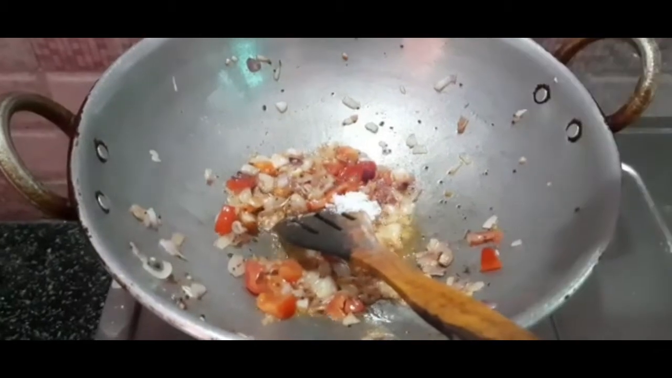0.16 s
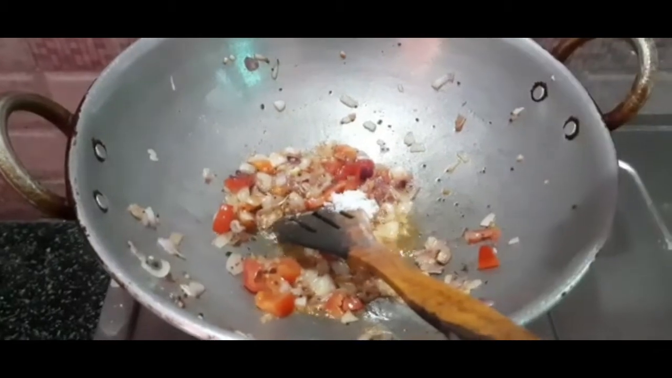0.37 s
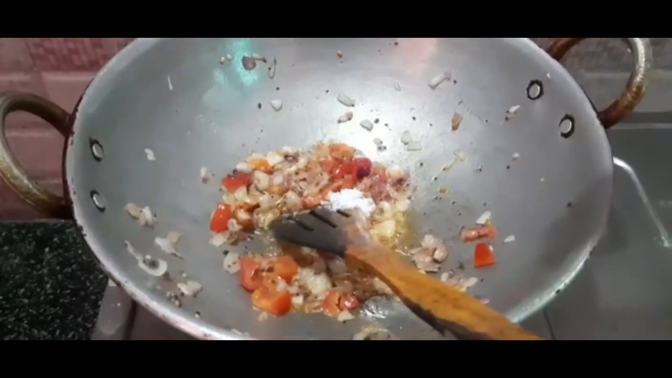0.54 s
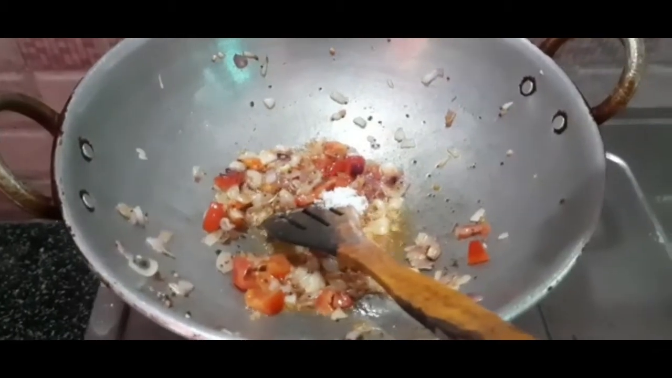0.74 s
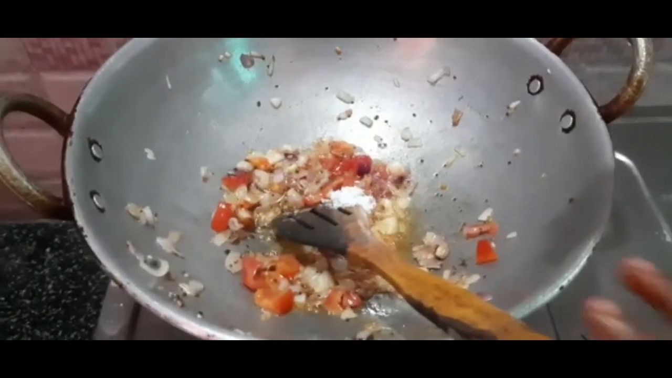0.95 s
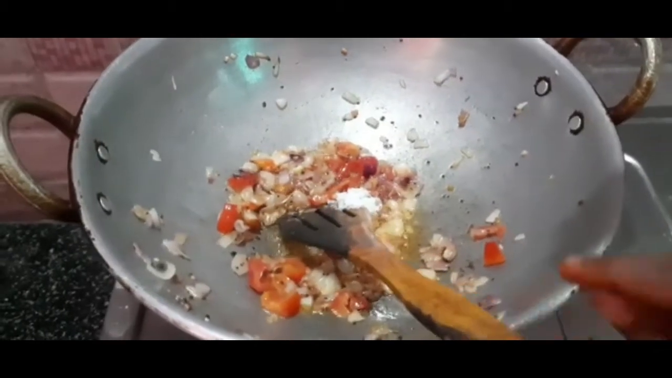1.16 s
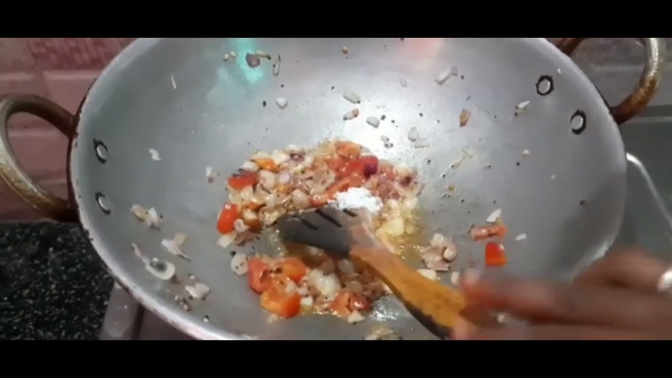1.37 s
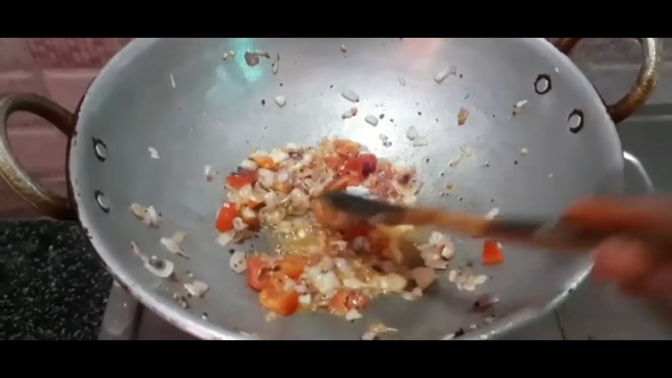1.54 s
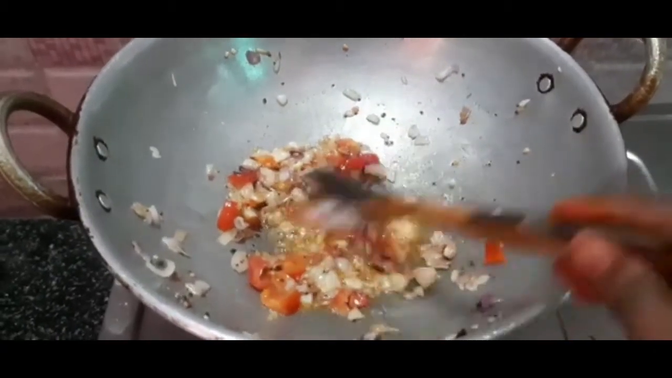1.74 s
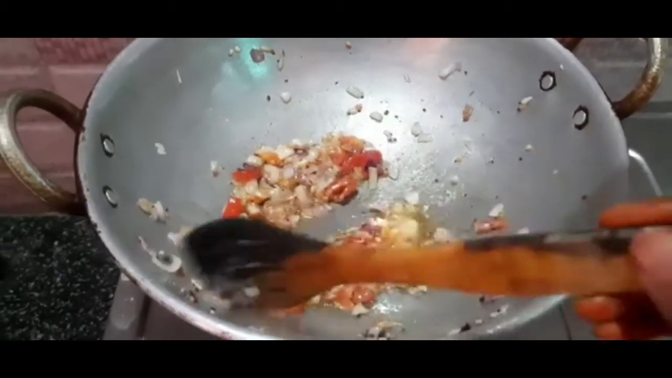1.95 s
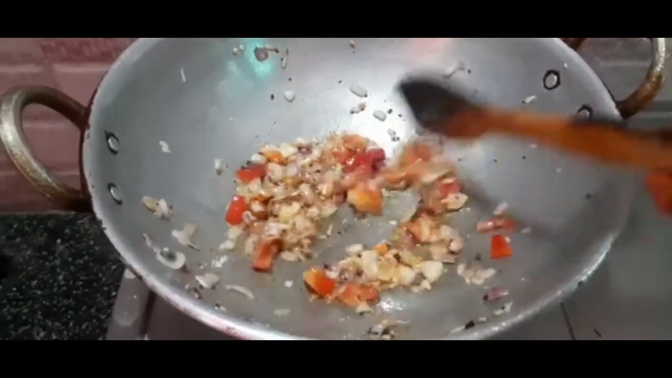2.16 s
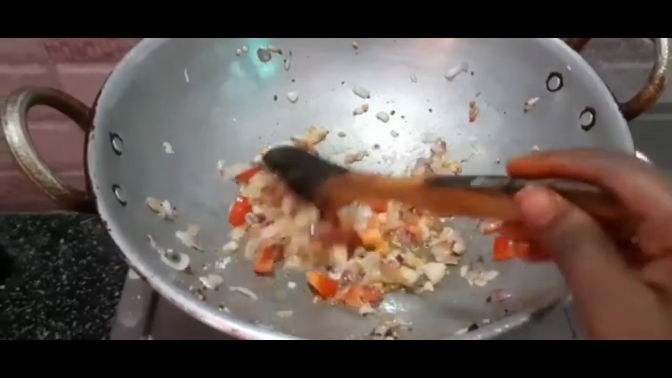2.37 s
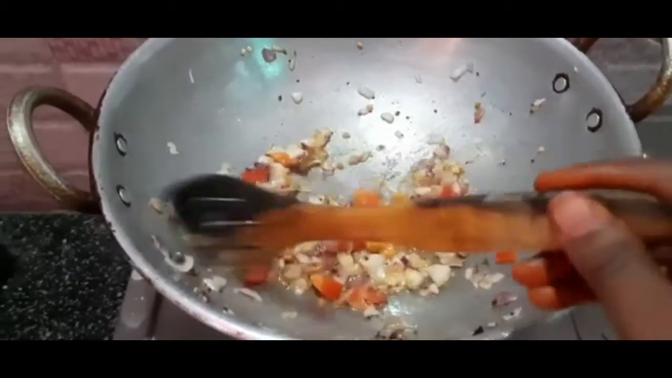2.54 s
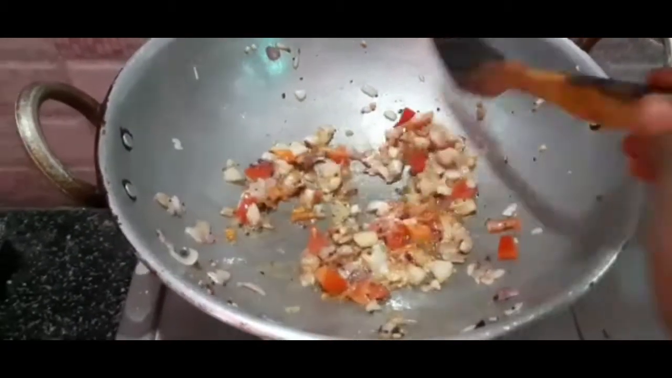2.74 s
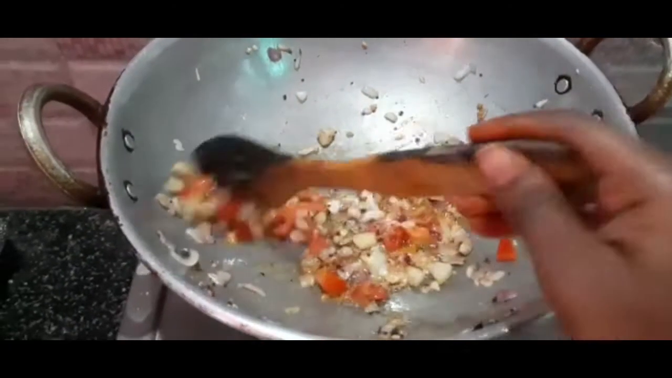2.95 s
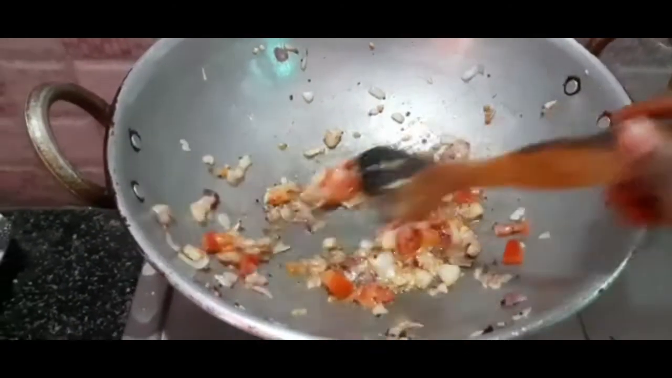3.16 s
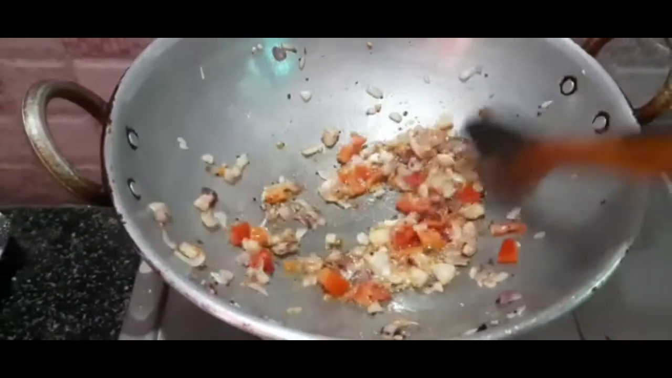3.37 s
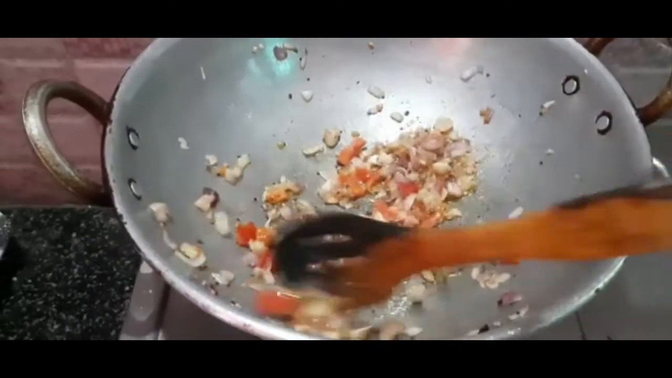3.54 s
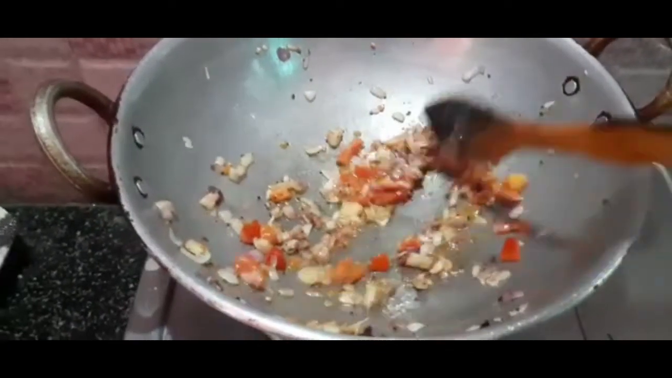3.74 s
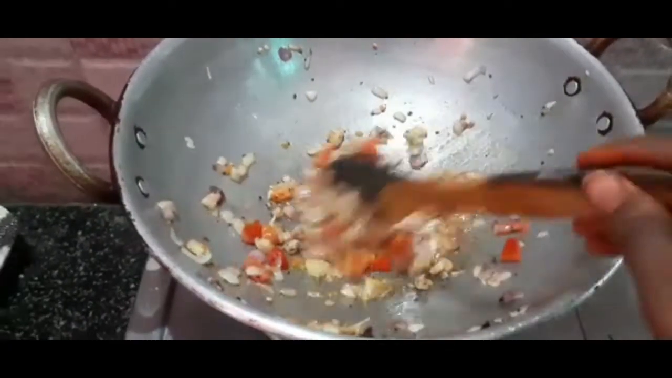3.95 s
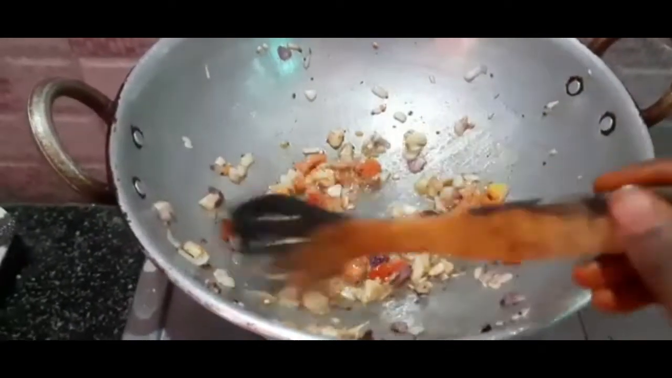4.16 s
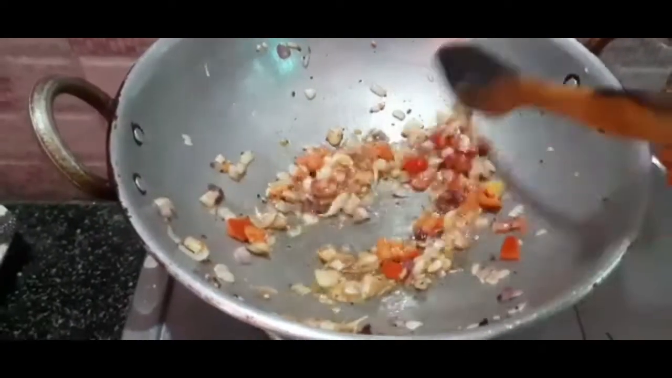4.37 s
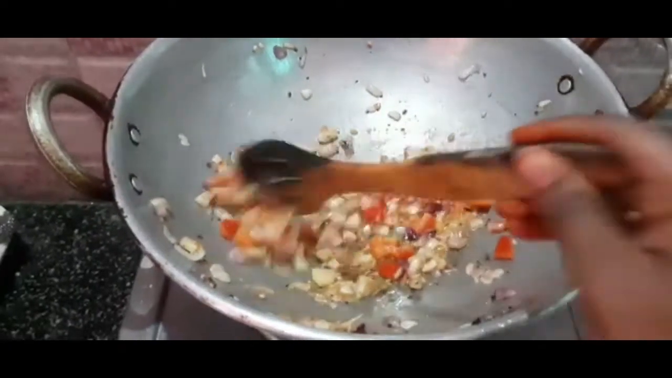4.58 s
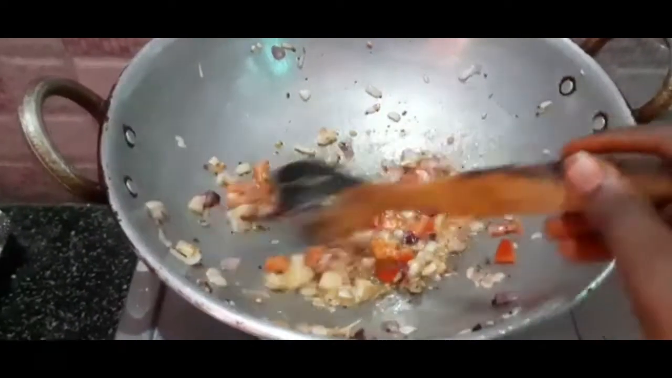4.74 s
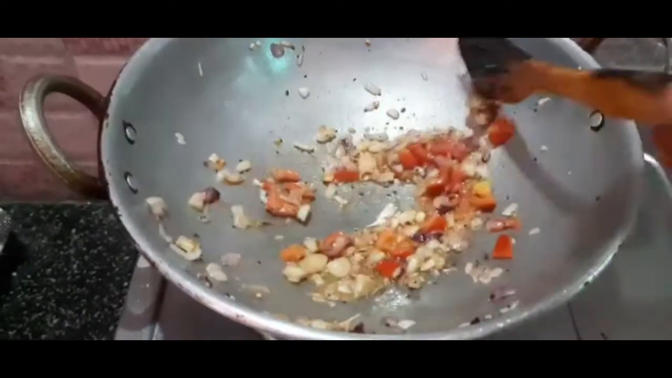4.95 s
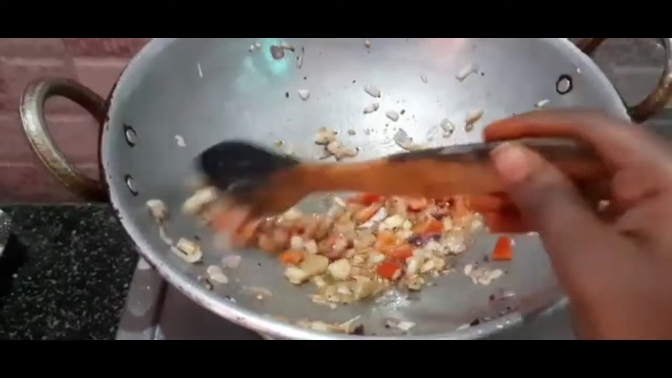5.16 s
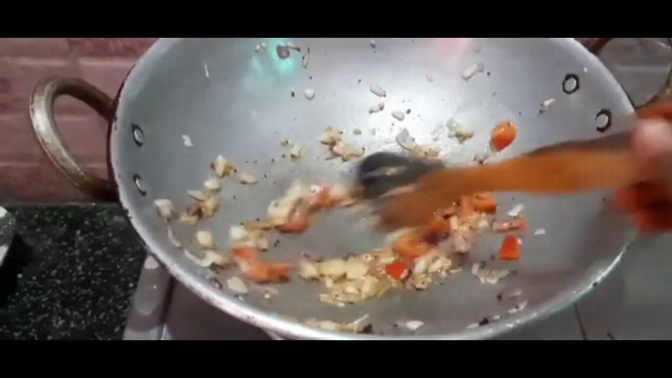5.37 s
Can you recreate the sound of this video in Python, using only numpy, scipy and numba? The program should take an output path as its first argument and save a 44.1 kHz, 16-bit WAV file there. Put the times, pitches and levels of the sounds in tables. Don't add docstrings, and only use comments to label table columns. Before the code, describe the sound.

A wooden spatula knocks and scrapes a thin ringing metal pan while onions and tomatoes sizzle in oil over a steady low motor hum.

```python
import sys
import numpy as np
from scipy import signal
from scipy.fft import rfft, irfft
from scipy.io import wavfile
from scipy.ndimage import uniform_filter1d
from numba import njit

SR = 44100
rng = np.random.default_rng(int(sys.argv[2]) if len(sys.argv) > 2 else 0)


def field_ratio(decibels):
    return 10 ** (np.asarray(decibels, dtype=float) / 20)


def master(y):
    cut = np.clip(np.atleast_2d(y).T, -1, 1)
    pcm = np.round(cut * 32767)
    wavfile.write(sys.argv[1], SR, pcm.astype(np.int16))


N = 238580
T = np.arange(N) / SR
HZ = np.fft.rfftfreq(N, 1 / SR) + 1


def level(x, db):
    return x * field_ratio(db) / np.sqrt(np.mean(np.mean(x, axis=0) ** 2))


def shape(points):
    hz, db = np.transpose(points)
    return field_ratio(np.interp(np.log(HZ), np.log(hz), db))


def humps(peaks):
    power = sum(field_ratio(db) ** 2 / (1 + (2 * (HZ - hz) / width) ** 2) ** 2 for hz, width, db in peaks)
    return np.sqrt(power)


def colour(x, gain):
    return irfft(rfft(x) * gain, N)


def diffuse(pair, alike_hz):
    alike = np.exp(-(HZ / alike_hz) ** 2)
    mid = colour(pair[0], np.sqrt(1 + alike))
    side = colour(pair[1], np.sqrt(1 - alike))
    return np.array([mid + side, mid - side]) / 2


def walk(rate):
    hold = int(SR / rate)
    steps = np.repeat(rng.standard_normal(N // hold + 1), hold)
    return uniform_filter1d(steps, hold)[:N]


@njit
def add(out, start, hz, decay, rise, size):
    for g in range(len(hz)):
        turn = np.exp(2j * np.pi * hz[g] / SR - decay[g])
        shrink = np.exp(-rise[g])
        for c in range(2):
            first = int(start[c, g])
            wait = 1.
            z = size[g] * np.exp(-2j * np.pi * hz[g] / SR * (start[c, g] - first))
            for j in range(first + 1, min(first + int(7 / decay[g]), out.shape[1])):
                z *= turn
                wait *= shrink
                out[c, j] += z.imag * (1 - wait)
    return out


# frequency in Hz, density in dB per Hz.
AIR = [(15, -57), (25, -41), (43, -17), (68, -21.5), (96, -9), (122, -15.5), (151, -17), (180, -21.5),
       (298, -19), (579, -19), (681, -22.5), (1040, -14.5), (1200, -12.5), (1560, -44), (2640, -120)]


def room_air():
    air = colour(diffuse(rng.standard_normal((2, N)), alike_hz=605), shape(AIR))
    return level(air, -47.5) * field_ratio(1.1 * walk(4.24))


# time in seconds, level in dB.
HUM = [(0, -56), (.3, -37.5), (.44, -39), (.62, -46), (.75, -41.5), (1.25, -47.5), (1.36, -43), (2.5, -44),
       (2.61, -53), (2.7, -44.5), (3.6, -45), (3.68, -48), (4.19, -40), (4.29, -47.5), (4.4, -41),
       (4.51, -53), (4.85, -45), (5.41, -52.5)]


def hum():
    hz = 100.2 + .3 * walk(2.9)
    hum_db = np.interp(T, *np.transpose(HUM)) + 1.3 * walk(6.6)
    lag = np.array([[.06], [0]])
    return np.sqrt(2) * field_ratio(hum_db) * np.sin(2 * np.pi * np.cumsum(hz) / SR - lag)


def room(x):
    t = T[:SR // 2]
    noise = rng.standard_normal((2, 2, len(t)))
    dull = signal.lfilter([.25], [1, -.75], noise[0]) * field_ratio(-60 * t / 0.33)
    bright = 0.29 * noise[1] * field_ratio(-60 * t / 0.14)
    tail = np.zeros((2, N))
    tail[:, :len(t)] = (dull + bright) * np.minimum(t / 0.0042, 1)
    tail = colour(diffuse(tail, alike_hz=450), 1 / (1 + (260 / HZ) ** 4))
    tail = tail / np.sqrt(np.sum(tail[0] ** 2))
    return signal.fftconvolve(x.mean(axis=0)[None], tail, axes=1)[:, :N]


# middle in seconds, half length in seconds, sizzle in dB, scrape in dB.
STROKES = [(1.05, 0.14, -48, -49.5), (1.445, 0.084, -70, -46.5), (1.574, 0.016, -46, -58),
           (1.81, 0.091, -40.5, -52), (1.934, 0.14, -43, -41.5), (2.093, 0.1, -40, -41),
           (2.3, 0.15, -38.5, -41.5), (2.628, 0.11, -38, -48), (2.862, 0.12, -35.5, -41.5),
           (3.11, 0.084, -41, -44), (3.25, 0.092, -39, -59), (3.374, .05, -37, -41),
           (3.49, 0.072, -41, -46), (3.698, 0.1, -38, -44.5), (3.933, 0.09, -37, -46.5),
           (4.064, 0.11, -41, -57), (4.255, 0.11, -38.5, -58), (4.476, 0.12, -36, -44),
           (4.822, 0.12, -38, -44.5), (4.983, 0.047, -43, -42), (5.105, 0.087, -37.5, -40.5),
           (5.4, 0.15, -45, -49.5)]


def strokes(column, rest_db):
    table = np.array(STROKES)[:, [0, 1, column]]
    swells = sum(field_ratio(db) ** 2 * np.exp(-((T - s) / half) ** 2) for s, half, db in table)
    return 10 * np.log10(field_ratio(rest_db) ** 2 + swells)


def bubbles(count, lo_hz, hi_hz, cycles, spread_db, lag):
    when, pitch, side = rng.random((count, 3)).T
    hz = lo_hz + (hi_hz - lo_hz) * pitch
    start = when * (N - 99) + 40 + np.outer([1, -1], lag * (side - .5))
    burst_db = spread_db * np.minimum(rng.exponential(size=count), 5)
    size = field_ratio(burst_db) * np.sqrt(hz / hi_hz)
    return level(add(np.zeros((2, N)), start, hz, hz / SR / cycles, 2 * hz / SR, size), 0)


# frequency in Hz, width in Hz, level in dB.
SEETHE = [
    (1180, 390, 0.5),
    (1560, 380, -12.5),
    (1880, 430, 1.5),
]


def seething(heat_db):
    big = bubbles(count=9000, lo_hz=515.0, hi_hz=3000.0, cycles=2.9, spread_db=1.5, lag=46.0)
    seethe_db = -48 + 0.5 * heat_db + 3.7 * walk(8)
    return level(colour(big, humps(SEETHE)), -1.4) * field_ratio(seethe_db)


# frequency in Hz, density in dB per Hz.
FIZZ = [(1180, -6), (2000, -4), (2440, -4.5), (2770, -3.5), (3070, -4), (3230, -4.5), (6090, -2),
        (6640, -1.5), (7680, -0.5), (9190, -7), (12600, 0.5), (14900, -2.5), (15500, -6)]
# start in seconds, level in dB, t60 in seconds.
JOLTS = [
    (1.167, -30.5, 0.14),
    (1.707, -34.5, 0.26),
]


def fizzing(rest_db, heat_db):
    jolt = sum((T > s) * field_ratio(db - 60 * np.abs(T - s) / t60) for s, db, t60 in JOLTS)
    keep = np.exp(-1 / SR / .25)
    late_db = signal.lfilter([1 - keep], [1, -keep], heat_db)
    spray_db = rest_db + 2.23 + 0.51 * heat_db + 0.46 * late_db
    hiss = level(rng.standard_normal((2, N)), 0.9) * field_ratio(1.0 * walk(19))
    fine = bubbles(count=22000, lo_hz=1400.0, hi_hz=21100.0, cycles=0.98, spread_db=0.74, lag=35.9)
    fizz = colour(fine + hiss, shape([(300, -43)] + FIZZ[:-1]))
    split = 1 / (1 + (HZ / 9500) ** 8)
    body = level(colour(fizz, split), 3.88) * np.hypot(field_ratio(rest_db + heat_db), jolt)
    spray = level(colour(fizz, 1 - split), 0.51) * field_ratio(spray_db + 0.9 * walk(24.77))
    return body + spray


def frying():
    rest_db = -42
    heat_db = strokes(column=2, rest_db=rest_db) - rest_db
    return fizzing(rest_db, heat_db) + seething(heat_db)


def short_hits(s, db, hz, t60, room_db):
    start = np.array([s * SR, s * SR + 3])
    decay = np.log(1000) / SR / t60
    return np.array([add(np.zeros((2, N)), start, hz, decay, 5.0 * decay, field_ratio(d))
                     for d in (db, db + room_db)])


# start in seconds, peak in dB, frequency in Hz.
SPITS = [(.058, -17, 9000), (.169, -15, 7510), (.219, -6, 11500), (.243, -16, 7000), (.4715, -17, 12500),
         (.511, -8, 13000), (.574, -16, 6200), (.5742, -17, 12500), (.6235, -12.5, 4200), (.63, -17, 7000),
         (1.3796, -8, 12900), (1.5718, -11, 6060), (2.611, -12, 4800)]


def spits():
    s, db, hz = np.transpose(SPITS)
    return short_hits(s, db, hz, 14 / hz, room_db=-12)


# start in seconds, peak in dB, frequency in Hz, t60 in seconds.
THUDS = [(1.420, -38, 140, 0.27), (1.708, -11.5, 415, 0.015), (1.830, -34, 140, 0.17),
         (2.060, -29.5, 141, 0.18), (3.017, -30, 380, 0.046), (3.855, -21.5, 450, .026),
         (4.166, -18, 310, 0.023), (4.415, -26, 303, 0.032), (4.441, -26.5, 226, 0.08),
         (4.717, -12.5, 325, 0.024), (5.000, -38, 149, 0.18)]


def thuds():
    s, db, hz, t60 = np.transpose(THUDS)
    return short_hits(s, db, hz, t60, room_db=-4.5)


# frequency in Hz, peak in dB, t60 in seconds, room share in dB.
HANDLE = [(420, -12.5, 0.019, -11), (690, -22, 0.0053, 8), (1010, -11.5, .013, -5), (1380, -14, 0.011, -5),
          (1880, -3, 0.015, -10.5), (2230, -11.5, .012, -5), (2840, -13.5, 0.012, 0.5),
          (3840, -9.5, 0.0048, -3), (4400, -14, 0.0069, 2), (5100, -3, 0.007, -6), (5920, -6, 0.0044, 5.5),
          (7800, -15, .005, -4)]


def handle_clack():
    hz, db, t60, room_db = np.transpose(HANDLE)
    return short_hits(1.1662 + 0.78 / hz, db, hz, t60, room_db)


PAN_HZ = [140, 231, 285, 301, 347, 377, 395, 435, 490, 526, 590, 657, 700, 740, 820, 915, 1010, 1070, 1125,
          1228, 1306, 1375]
# level in dB, t60 in seconds.
PAN = [(-11, 0.47), (-1.5, 0.2), (-7, 0.34), (-0.5, 0.33), (-46, .2), (-6, 0.14), (-8, 0.35), (-5, 0.32),
       (-4, 0.44), (-5, 0.21), (-5, 0.16), (-7, 0.34), (-14, 0.056), (-3, 0.21), (-3, 0.078), (-3, 0.08),
       (-9, 0.17), (-5, 0.27), (0.5, 0.08), (-9, 0.53), (-3, 0.088), (-8.5, 0.47)]


def strike_pan(table, length, cycles, lead_s, rise_s):
    s, db, tap_hz, ring_db, centre_hz = np.transpose(table)
    start = (np.array([s, s]) + lead_s) * SR
    rise = 1 / rise_s / SR
    taps = add(np.zeros((2, N)), start, tap_hz, tap_hz / SR / cycles, 0 * s + rise, field_ratio(db + 7.0))
    hz = np.array(PAN_HZ, float)
    mode_db, t60 = np.transpose(PAN)
    spot = rng.standard_normal((len(s), 3, len(hz)))
    octaves = np.log2(hz / centre_hz[:, None])
    gain_db = (db + ring_db)[:, None] + mode_db - 1.52 * octaves ** 2 + 1.6 * spot[:, 0]
    delay = 50 * np.abs(spot[:, 1]) + 6 * np.array([spot[:, 2], -spot[:, 2]])
    rings = (start[:, :, None] + delay).reshape(2, -1)
    decay = (np.log(1000) / SR / np.outer(0 * s + length, t60)).ravel()
    return add(taps, rings, np.tile(hz, len(s)), decay, 0 * decay + rise, field_ratio(gain_db).ravel())


# start in seconds, peak in dB, tap and ring centre in Hz, ring in dB under the tap.
ROCKS = [(1.179, -21, 420, -7), (1.719, -30, 297, -13), (1.736, -15, 484, -13), (1.777, -36, 477, -19),
         (1.974, -48, 310, -5), (2.004, -23, 383, -18), (2.244, -25, 440, -14), (2.262, -26, 453, -23),
         (2.531, -28.5, 316, -5), (2.546, -23.5, 396, -5), (2.809, -19, 433, -32), (3.12, -33.5, 364, -7),
         (3.358, -21, 444, -14), (3.879, -24, 452, -29), (4.19, -24, 298, -11), (4.417, -32, 299, -8.5),
         (4.729, -15.5, 296, -9), (4.749, -45, 281, -12), (4.79, -29, 297, -23)]


def rocking():
    rows = [(s, db, hz, ring_db, hz) for s, db, hz, ring_db in ROCKS]
    return strike_pan(rows, length=0.68, cycles=2.3, lead_s=0.001915, rise_s=0.005)


# frequency in Hz, width in Hz, level in dB.
SQUEAL = [
    (1045, 40, 0),
    (965, 40, -8),
    (1170, 60, -12),
]


def scraping():
    ticks = rng.standard_normal((2, 2, N)) * (rng.random(N) < .05) * field_ratio(1.5 * walk(40))
    modes = [(hz, 8.0 / t60, db - 3.1 * np.log2(hz / 300) ** 2) for hz, (db, t60) in zip(PAN_HZ, PAN)]
    scrape = level(colour(diffuse(ticks[0], alike_hz=650.0), humps(modes)), 0)
    scrape = scrape * field_ratio(strokes(column=3, rest_db=-57))
    corners = 4.89 + np.cumsum([0, .07, .2, .04])
    swell = np.interp(T, corners, [0, field_ratio(-38), field_ratio(-38 - 7), 0])
    song = level(colour(diffuse(ticks[1], alike_hz=1500), humps(SQUEAL)), 0)
    return scrape + song * swell


# start in seconds, peak in dB,
# frequency in Hz, t60 in seconds, room share in dB.
EDGES = [
    (.9940, -22, 2000, .008, -7),
    (1.1657, -17, 2380, .006, -21),
    (1.963, -22, 2240, 0.0041, 2),
    (2.5210, -13.5, 1880, .0062, -3),
    (2.5215, -24, 2510, .008, -7),
    (3.3350, -25, 1700, 0.0099, -6),
    (4.7190, -17.5, 1600, 0.0067, -3),
]


def knock_edges():
    return short_hits(*np.transpose(EDGES))


# start in seconds, peak in dB, frequency in Hz, t60 in seconds, room share in dB.
CRACK = [
    (1.7074, -6, 5600, .008, -14),
    (1.7081, -4.5, 6900, .009, -14),
    (1.7078, -12, 4200, .005, -16),
    (1.7084, -15, 9500, .005, -16),
]


def crack():
    return short_hits(*np.transpose(CRACK))


# start in seconds, peak in dB, wood tap in Hz, ring in dB under the tap,
# ring centre in Hz.
KNOCKS = [(0.989, -25.5, 1240, -24, 338), (1.087, -33.5, 1040, -8.5, 431), (1.704, -8.5, 890, -14, 304),
          (1.958, -7, 1035, -17, 298), (2.228, -9, 870, -14.5, 425), (2.517, -8.5, 1060, -19, 298.5),
          (2.783, -13.5, 900, -18, 400), (3.016, -23, 1000, -12.5, 374), (3.331, -12, 890, -15.5, 430),
          (3.852, -22, 890, -11.5, 433), (4.163, -18, 1040, -11.5, 300), (4.714, -12, 1010, -12, 299)]


def knocks():
    return strike_pan(KNOCKS, length=0.64, cycles=1.3, lead_s=.0034, rise_s=.0006)


def scene():
    pan_hits = rocking() + knocks()
    direct, send = spits() + thuds() + handle_clack() + knock_edges() + crack()
    struck = pan_hits + direct + room(field_ratio(-7) * pan_hits + 1.5 * send)
    struck = signal.sosfilt(signal.butter(3, 135, "high", fs=SR, output="sos"), struck)
    return room_air() + hum() + frying() + scraping() + struck


# frequency in Hz, left over right in dB.
PORT_TILT = [(40, .3), (100, -2.5), (250, -1), (500, .4), (4000, 0.3), (8000, -0.5), (12000, 4.5)]


def ports(x):
    tilt = np.sqrt(shape(PORT_TILT))
    return colour(x, np.array([tilt, 1 / tilt]) * (HZ < 15680))


def low_pass(x):
    return signal.sosfilt(signal.butter(12, 15880, fs=SR, output="sos"), x)


def record(dry):
    skip_db = np.interp(T - .508, [-.007, 0, .032], [0, -10, 0])
    rounded = .95 * np.tanh(dry * field_ratio(skip_db) / .95)
    return low_pass(ports(rounded))


dry = scene()
out = record(dry)
master(out)
```